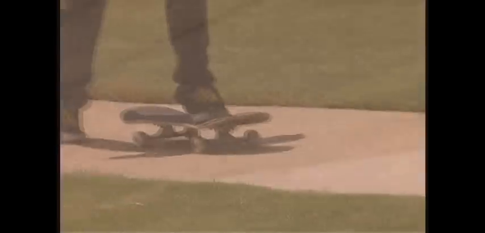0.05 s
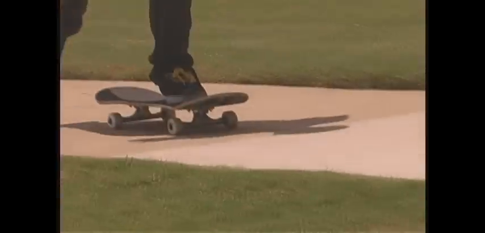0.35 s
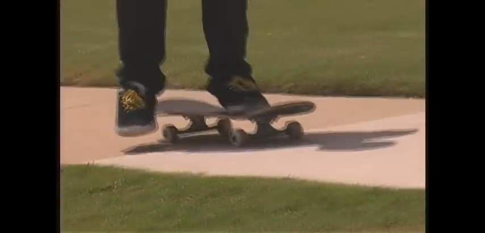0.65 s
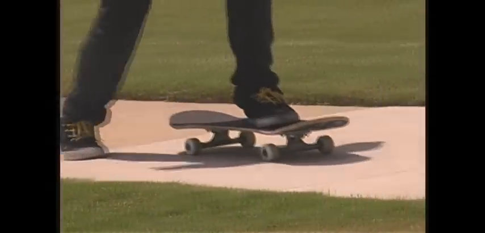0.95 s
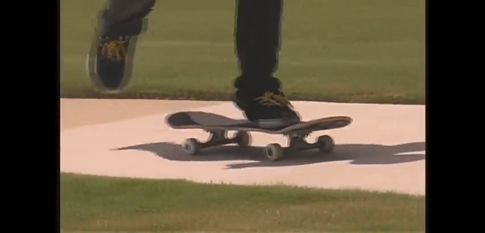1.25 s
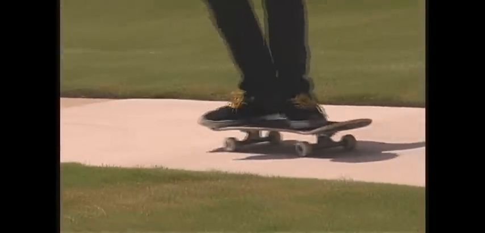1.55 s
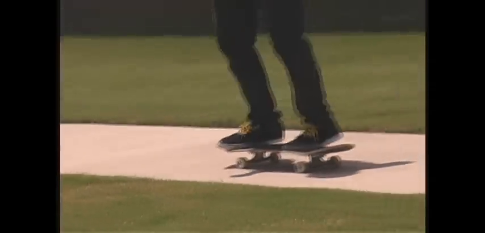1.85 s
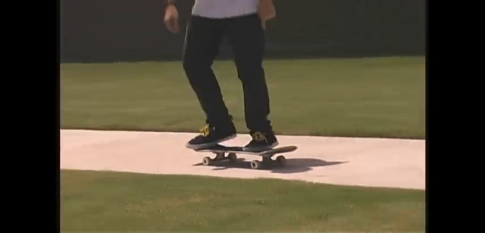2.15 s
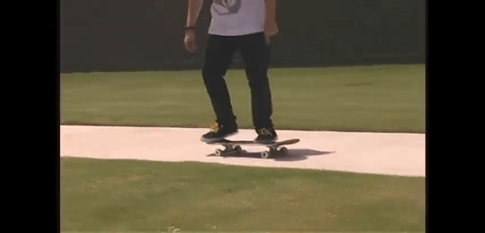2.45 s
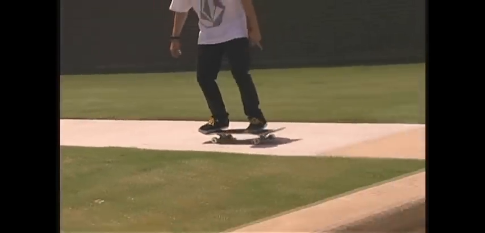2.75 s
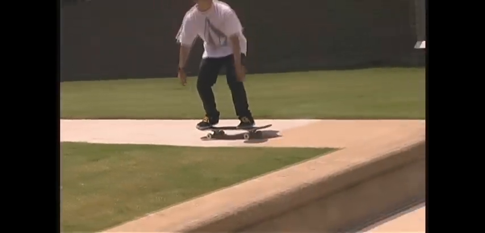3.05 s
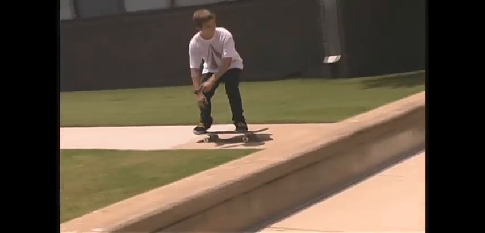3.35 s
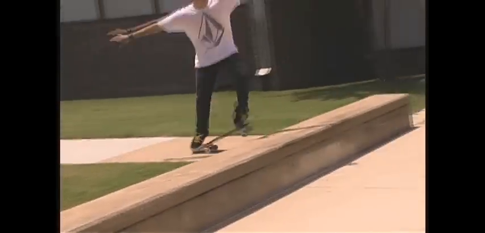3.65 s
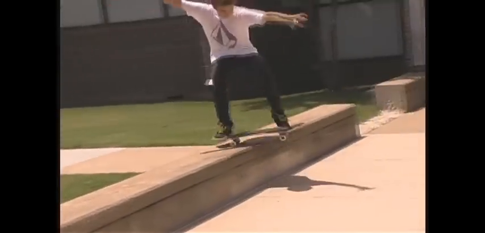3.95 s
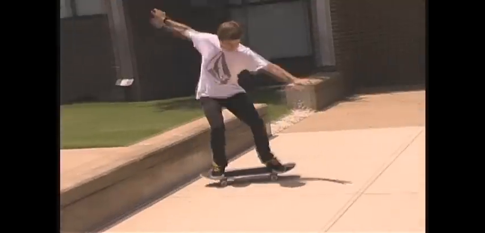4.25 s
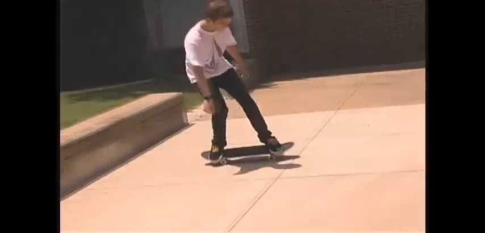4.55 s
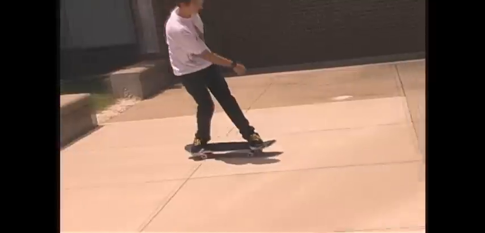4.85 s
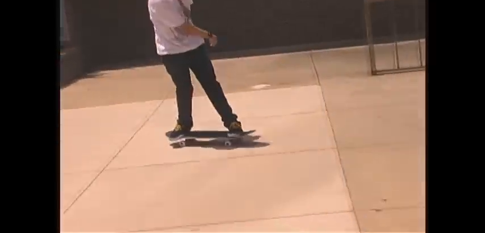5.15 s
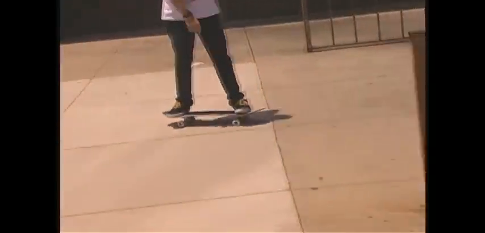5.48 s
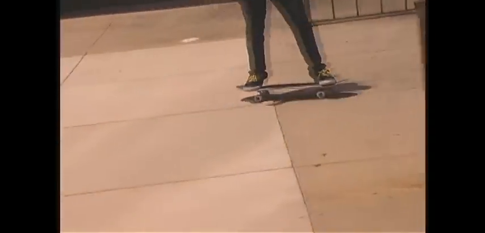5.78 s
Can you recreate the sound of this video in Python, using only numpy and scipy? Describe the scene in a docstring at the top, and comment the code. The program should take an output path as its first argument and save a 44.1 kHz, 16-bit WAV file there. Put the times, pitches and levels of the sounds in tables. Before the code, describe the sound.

A skateboard rolls along an outdoor concrete path, its hard wheels hissing over a low rumble. Soft shoe thuds and scuffs mix with dry knocks, and the wheels click across pavement joints. Around four seconds in, the board pops, cracks against a ledge and lands in a loud clatter that slightly overloads the microphone and echoes briefly off nearby walls. It then rolls on with a few more clicks.

```python
"""A skateboard pushes off along a concrete path, clacks over its joints, pops onto a ledge, drops to a
plaza and rolls away. Surface roughness makes the hard wheels hiss and drums the maple deck; each impact
excites the board's modes and rattles the loose trucks. Shoes thud and scrape, an insect buzzes faintly,
nearby buildings reflect the blows, and the landings overload the microphone."""
import sys
import numpy as np
from scipy import signal
from scipy.fft import rfft, irfft, next_fast_len
from scipy.io import wavfile
from scipy.ndimage import uniform_filter1d, map_coordinates

SR = 44100
rng = np.random.default_rng(int(sys.argv[2]) if len(sys.argv) > 2 else 0)


def waveform_to_disk(signal):
    """Save audio, clipped to [-1, 1], as 16-bit WAV at the path in sys.argv[1]."""
    frames = np.transpose(np.atleast_2d(signal))
    scaled = np.clip(frames, -1, 1) * 32767
    samples = np.round(scaled).astype(np.int16)
    wavfile.write(sys.argv[1], SR, samples)


N = 265482
TIME = np.arange(N) / SR
LANDING_S, PRESS_ATTACK_S = 4.25, 0.047  # touchdown on the plaza; rise time of the load


def amp(db):
    """Decibels to amplitude ratio."""
    return 10 ** (np.asarray(db) / 20)


def unit(x):
    """Normalisation to rms 1."""
    return x / np.sqrt(np.mean(x ** 2) + 1e-20)


def along(points, hz):
    """Interpolation of (Hz, value) points on a log frequency axis."""
    f, v = np.transpose(points)
    return np.interp(np.log(hz + 1), np.log(f + 1), v)


def strength(rows):
    """A (seconds, dB) contour, sample by sample, in dB above its median."""
    db = np.interp(TIME, *np.transpose(rows))
    return db - np.median(db)


def swell(s, width):
    """A Gaussian envelope of height 1 around time s."""
    return np.exp(-((TIME - s) / width) ** 2)


def wobble(rate):
    """Smooth random modulation, rate knots a second."""
    return map_coordinates(rng.standard_normal(int(N * rate / SR) + 4), [TIME * rate])


def resonance(hz, centre, width, power=2):
    """A resonance curve of height 1; a higher power steepens its skirts."""
    return 1 / (1 + (2 * (hz - centre) / width) ** power)


def filtered(x, gain):
    """Minimum-phase filtering with the given gain over frequency."""
    n = x.shape[-1]
    m = 2 * next_fast_len(n)
    cepstrum = irfft(np.log(np.maximum(gain(np.fft.rfftfreq(m, 1 / SR)), 1e-6)))
    cepstrum[1:m // 2] *= 2
    cepstrum[m // 2 + 1:] = 0
    return irfft(rfft(x, m) * np.exp(rfft(cepstrum)), m)[..., :n]


def add(track, s, sound):
    """Superposition of a sound on a track from time s on."""
    part = track[..., round(s * SR):][..., :sound.shape[-1]]
    part += sound[..., :part.shape[-1]]


def spread(pair, side_db, left_db):
    """Mid-side stereo from two uncorrelated signals."""
    side = amp(side_db) * pair[1]
    return np.array([(pair[0] + side) * amp(left_db / 2), (pair[0] - side) * amp(-left_db / 2)])


def air():
    """Ambient noise: the low murmur of open air."""
    # Each row: frequency in Hz, relative level in dB.
    spectrum = [(15, -3), (40, -0.5), (90, 6), (200, -25), (500, -22), (2000, -31.5), (8000, -61),
                (14000, -70)]
    noise = unit(filtered(rng.standard_normal((2, N)), lambda hz: amp(along(spectrum, hz))))
    return amp(-52) * spread(noise, side_db=-17.5, left_db=-3)


def insect(centre_hz=8050, width_hz=950, pulses_per_s=23, unsteady=0.064):
    """Amplitude modulation: slightly uneven wing strokes pulse a narrow band of noise."""
    buzz = unit(filtered(rng.standard_normal(N), lambda hz: resonance(hz, centre_hz, width_hz, power=4)))
    rate = pulses_per_s * (1 + unsteady * wobble(4.9))
    strokes = np.sin(np.pi * np.cumsum(rate) / SR) ** 4
    return amp(-59) * swell(s=1, width=0.5) * unit(strokes) * buzz


def yard(x, build_s):
    """Diffuse reflections from ledge and buildings build up and decay, uncorrelated in the two ears."""
    # Each row: frequency in Hz, reverberation time in seconds.
    t60s = [(100, 0.17), (300, 0.89), (600, 0.11), (1600, 0.58), (4000, 0.39), (8000, 0.39), (14000, 0.31)]
    spectrum = [(100, -38), (280, 10), (550, -2.5), (1600, 2), (4000, 1), (10000, -0.5)]  # Hz, dB
    hz, t, noise = signal.stft(rng.standard_normal((2, SR)), SR, nperseg=256)
    colour = amp(along(spectrum, hz))[:, None]
    envelope = amp(-60 * t / along(t60s, hz)[:, None]) * (1 - np.exp(-t / build_s))
    tail = signal.istft(noise * colour * envelope, SR, nperseg=256)[1]
    return signal.fftconvolve(x.mean(axis=0)[None], tail / np.linalg.norm(tail[0]), axes=1)[:, :N]


def steps(push_hz=175, t60=0.071, gain_db=-2):
    """Damped impact: a rubber sole gives a dull push with a short puff."""
    # Each row: start in seconds, relative level in dB.
    footfalls = [(0.297, -19.5), (0.421, -28), (0.461, -19.5), (0.512, -22.5)]
    spectrum = [(80, -5), (200, 6.5), (600, 2), (1100, -22), (4000, -43)]  # Hz, dB
    out, t = np.zeros(N), np.arange(SR // 4) / SR
    push = np.sin(2 * np.pi * push_hz * t)
    envelope = amp(gain_db - 60 * t / t60) * (1 - np.exp(-t / 0.0025))
    for s, db in footfalls:
        puff = unit(filtered(rng.standard_normal(len(t)), lambda hz: amp(along(spectrum, hz))))
        add(out, s, amp(db) * envelope * (push + 0.73 * puff))
    return out * amp([[1.5], [-1.5]])


def scuffs(slips_per_s=170, slip_decay_s=0.0015, fade_db=7):
    """Stick-slip friction of a sole on grip tape: uneven little snaps on a rasp."""
    # Each row: start in seconds, length in seconds, level in dB, treble gain in dB.
    scrapes = [(0.054, 0.14, -43, -16), (0.913, 0.16, -45, 4), (1.577, 0.17, -43, -3),
               (2.251, 0.087, -38, -5.5), (3.828, 0.058, -36.5, -3), (3.941, 0.071, -41.5, 5),
               (4.138, 0.14, -37, -1), (5.743, 0.27, -43, 14)]
    spectrum = [(400, -9), (1500, -2.5), (2600, -1.5), (3600, 1), (6000, -2.5), (9000, -6.5),
                (14000, -28)]  # Hz, dB
    out = np.zeros((2, N))
    for s, length, db, treble_db in scrapes:
        progress = np.linspace(0, 1, round(length * SR))
        n = len(progress)
        slips = (rng.random(n) < slips_per_s / SR) * rng.uniform(0.56, 1, n)
        force = 0.15 + signal.lfilter([1], [1, -np.exp(-1 / (slip_decay_s * SR))], slips)
        colour = lambda hz: amp(along(spectrum, hz) + along([(2600, 0), (5000, treble_db)], hz))
        rasp = unit(filtered(force * rng.standard_normal((2, n)), colour))
        envelope = np.sqrt(np.abs(np.sin(np.pi * progress))) * amp(db + fade_db * (0.5 - progress))
        add(out, s, envelope * spread(rasp, side_db=-39, left_db=-1.5))
    return out


def grit(spiky_db):
    """Roughness excitation: countless tiny contacts, a few far stronger than the rest."""
    sizes = amp(spiky_db * rng.exponential(size=(2, N // 16 + 1)).clip(0, 6))
    envelope = uniform_filter1d(sizes.repeat(16, axis=1), size=8)[:, :N]
    return unit(envelope * rng.standard_normal((2, N)))


def board(hz, between_db, scatter_db=0):
    """Modal response of deck, trucks and wheels over a flat floor; contact points reweight the modes."""
    # Each row: frequency in Hz, bandwidth in Hz, relative level in dB.
    modes = [(680, 74, 1), (1030, 560, -8), (1302, 120, -1.5), (1630, 128, 4), (2214, 226, 3.5),
             (2560, 82, 1), (2930, 290, 1), (3440, 140, -30), (3690, 380, 0), (4700, 970, -3),
             (6070, 280, -5), (6980, 550, -6.5)]
    weights_db = scatter_db * rng.standard_normal(len(modes))
    peaks = sum(amp(db + extra_db) ** 2 * resonance(hz, centre, width)
                for (centre, width, db), extra_db in zip(modes, weights_db))
    return np.sqrt(peaks + amp(between_db) ** 2)


def sing(centre_hz=2440, width_hz=540):
    """Lateral creep: leaning wheels slide on the concrete and ring in one narrow resonance."""
    # Each row: centre in seconds, half width in seconds, level in dB.
    leans = [(.12, 0.1, -49), (1.04, 0.025, -52), (1.68, 0.043, -44.5), (3.04, 0.049, -47.5)]
    ring = unit(filtered(grit(spiky_db=2.5), lambda hz: resonance(hz, centre_hz, width_hz)))
    envelope = sum(amp(db) * swell(s, width) for s, width, db in leans)
    return spread(ring, side_db=-3, left_db=-5) * envelope


def whirr(roll_db, follows=0.98, full_speed_s=6.1, slow_start_db=-6.5):
    """Resonances of the spinning wheels grow with speed; path and plaza favour different ones."""
    # Each row: frequency in Hz, width in Hz, base level on path and on plaza in dB, mid-air gain in dB.
    modes = [(1220, 510, -53, -61.5, 11), (1625, 650, -59, -49.5, 12), (2400, 690, -62, -59.5, 8)]
    out = np.zeros((2, N))
    drive_db = follows * roll_db + np.interp(TIME, [0, full_speed_s], [slow_start_db, 0])
    free_spin = swell(s=3.97, width=0.04)
    for centre, width, path_db, plaza_db, spin_db in modes:
        ring = unit(filtered(grit(spiky_db=4), lambda hz: resonance(hz, centre, width)))
        mode_db = np.where(TIME < LANDING_S, path_db, plaza_db) + spin_db * free_spin
        out += amp(mode_db + drive_db + 3.1 * wobble(21.83)) * spread(ring, side_db=-6, left_db=-1)
    return out


def drone(deck_db, mode_hz=150, sag_hz=27.57, waver=0.013, follows=2.12, crouch_db=9):
    """Rolling sustains the deck's main bending mode; a crouching rider's load makes it lower and louder."""
    crouch = swell(s=3.25, width=0.13)
    hz = (mode_hz - sag_hz * crouch) * (1 + waver * wobble(25))
    phase = 2 * np.pi * np.cumsum(hz) / SR
    ground_db = np.where(TIME < LANDING_S, -52.5, -42.5)  # clearer on the smooth plaza
    return np.sin(phase) * amp(ground_db + follows * deck_db + crouch_db * crouch + wobble(11))


def boom(centre_hz=258, width_hz=150, level_db=-29, t60=1):
    """Resonant decay: after the drop the fully loaded deck rings on, low and rough."""
    noise = rng.standard_normal((2, N))
    ring = unit(filtered(noise, lambda hz: resonance(hz, centre_hz, width_hz, power=4)))
    age = np.maximum(TIME - LANDING_S, 0)
    envelope = amp(level_db - 60 * age / t60) * np.minimum(age / PRESS_ATTACK_S, 1)
    return spread(ring, side_db=-10, left_db=1) * envelope


def press(hold_s=0.14, release_s=0.08):
    """Contact load, 0 to 1: the rider's weight bears down after the drop."""
    corners = LANDING_S + np.cumsum([0, PRESS_ATTACK_S, hold_s, release_s])
    return np.interp(TIME, corners, [0, 1, 1, 0])


def rolling(roll_db, deck_db):
    """Forced vibration: rough concrete shakes the deck, growls in the wheels, hisses at the contacts."""
    # Each row: frequency in Hz, relative level in dB.
    deck_spectrum = [(24, -30.5), (40, -1), (81, -2), (113, -0.5), (139, 1.5), (281, -9.5), (462, -25.5),
                     (600, -35), (780, -39), (1320, -120)]
    wheel_spectrum = [(300, 0.5), (550, 2), (850, 3), (1500, -7.5), (2300, -3.5), (4000, -4), (8000, -43.5)]
    contact_spectrum = [(900, -42), (2300, -8.5), (4000, 1), (6500, 0.5), (9000, -5), (11000, -13.5),
                        (13000, -25), (15000, -63)]
    load = press()
    texture = amp(wobble(28))  # patches of coarser and smoother ground
    rumble = filtered(grit(spiky_db=3), lambda hz: amp(along(deck_spectrum, hz)))
    growl = filtered(grit(spiky_db=2), lambda hz: amp(along(wheel_spectrum, hz)) * board(hz, 8))
    hiss = filtered(grit(spiky_db=2.5), lambda hz: amp(along(contact_spectrum, hz)) * board(hz, 11))
    rumble = spread(unit(rumble), side_db=-13, left_db=-1) * amp(-43 + deck_db + 12 * load)
    growl = spread(unit(growl), side_db=-1, left_db=0.8) * amp(-51.5 + 0.34 * roll_db + 14 * load)
    hiss = spread(unit(hiss), side_db=-11.5, left_db=-0.2) * amp(-49.5 + roll_db + 15 * load)
    return texture * (rumble + growl + hiss)


def flex(t):
    """Free vibration: the struck deck's bending modes decay, varying in level and pitch at each blow."""
    # Each row: mean frequency in Hz, relative level in dB, 60 dB decay time in seconds.
    modes = [(107.5, -9.5, 0.28), (153, 1.5, 0.067), (210.6, -1, 0.15), (284.3, -4.5, 0.14)]
    bend = np.zeros(len(t))
    for k, (hz, db, t60) in enumerate(modes):
        decay = amp(db + rng.normal(0, 0.89) - 60 * t / t60)
        bend += (-1) ** k * decay * np.sin(2 * np.pi * hz * rng.normal(1, 0.0575) * t)
    bend *= 1 - np.exp(-t / 0.0014)  # the rider's weight comes on gradually
    return bend / np.abs(bend).max()


def blows(rows, hold, rattle_db, rattle_t60, chatter_db, gain_db, treble_db, wood_hz,
          flex_db, side_db, rise_s):
    """Impact excitation: a burst of contacts and a faint truck rattle ring the board; the deck bends."""
    # Each row: frequency in Hz, relative level in dB.
    crack = [(200, -2.5), (500, -7.5), (900, 1), (1600, -3), (3200, -1.5), (6500, 1.5), (9000, -2),
             (12000, -16), (15000, -29)]
    side_spectrum = [(600, 17), (1500, 14.5), (4000, 3), (9000, -4)]  # the clack's low and middle notes sound wide, its treble centred
    out, t = np.zeros((2, N)), np.arange(SR // 4) / SR
    for s, db, wood_db, t60 in rows:
        chatter = amp(chatter_db * unit(uniform_filter1d(rng.standard_normal(len(t)), size=40)))
        burst = amp(-60 * (t / t60) ** hold)  # hold above 1: contacts persist, then stop quickly
        rattle = amp(rattle_db - 60 * t / rattle_t60)
        force = chatter * (burst + rattle) * (1 - np.exp(-t / rise_s))
        # where the board is hit tips the colour towards wood or metal
        tilt = [(wood_hz, wood_db), (2 * wood_hz, 0), (5500, 0), (9000, treble_db)]
        colour = lambda hz: amp(along(crack, hz) + along(tilt, hz)) * board(hz, -5, scatter_db=3)
        clack = filtered(force * rng.standard_normal((2, len(t))), colour)
        clack /= np.sqrt(uniform_filter1d(clack ** 2, size=128).max(axis=1, keepdims=True))
        clack[1] = filtered(clack[1], lambda hz: amp(along(side_spectrum, hz)))
        thump = amp(flex_db + 0.61 * wood_db) * flex(t)  # woodier blows bend the deck more
        add(out, s, amp(db) * (amp(gain_db) * spread(clack, side_db, left_db=-0.5) + thump))
    return out


def knocks():
    """Light impacts: deck and trucks knock drily as the feet shift."""
    # Each row: start in seconds, relative level in dB, woodiness in dB, 60 dB decay time in seconds.
    hits = [(.045, -4, -1.5, 0.022), (.077, -13.5, -1, 0.03), (.116, -25, -12, .016),
            (.126, -14, -7.5, 0.016), (.905, -6, -9.5, 0.017), (1.294, -17.5, -9.5, .014),
            (1.328, -17, -31, 0.016), (1.542, -20, -10, 0.016), (1.556, -3, -0.5, 0.029),
            (1.568, -9.5, -0.5, 0.015), (2.3, -14.5, -9, 0.02), (5.953, -13, -1, 0.019)]
    return blows(hits, hold=0.93, rattle_db=-22.5, rattle_t60=0.25, chatter_db=1, gain_db=-10,
                 treble_db=-8.5, wood_hz=1330, flex_db=-27, side_db=-23, rise_s=0.00039)


def joints():
    """Impacts at surface discontinuities: the wheels strike joints in the concrete."""
    # Each row: start in seconds, relative level in dB, woodiness in dB, 60 dB decay time in seconds.
    hits = [(.458, -28, 13, 0.056), (.484, -29, 7, 0.027), (.734, -25, 4.5, 0.06), (1.389, -12, 3.5, 0.058),
            (1.4, -25, -8, 0.027), (1.838, -21, -11.5, 0.071), (1.969, -12, 3.5, 0.034),
            (2.091, -21, 2.5, 0.076), (2.127, -17, 6.5, 0.035), (2.591, -16.5, 3, 0.043),
            (2.598, -14, 10.5, 0.024), (2.739, -14.5, 8.5, 0.034), (2.909, -13, 3.5, 0.042),
            (3.22, -16.5, 8.5, 0.045), (3.405, -17.5, 8.5, 0.027), (3.698, -29, 7, 0.028),
            (4.788, -10.5, 1, 0.024), (4.827, -21, 4, 0.032), (4.965, -24.5, 0, 0.022),
            (4.995, -15.5, 6.5, .055), (5.735, -12.5, 11.5, 0.027), (5.762, -17, 4, 0.021),
            (6.012, -18.5, 15.5, .04)]
    return blows(hits, hold=1.35, rattle_db=-23.5, rattle_t60=0.61, chatter_db=5, gain_db=-8,
                 treble_db=2, wood_hz=960, flex_db=-19, side_db=-32.5, rise_s=0.00051)


def slams():
    """Heavy impacts: the pop, the blows on the ledge and the landing."""
    # Each row: start in seconds, relative level in dB, woodiness in dB, 60 dB decay time in seconds.
    hits = [(3.816, -16, -3.5, 0.049), (4.078, -0.5, -14.5, 0.022), (4.082, 0, 1.5, 0.033),
            (4.12, -4, -3, 0.047), (4.194, -20, 2, .049), (4.21, -16.5, 3.5, 0.034), (4.271, 3.5, 1, 0.022),
            (4.28, -5.5, 6.5, 0.078), (4.315, 4, 0.5, .021), (4.335, 1, 4.5, 0.03),
            (4.344, -3.5, 1.5, 0.068), (4.375, -2.5, 0, 0.061), (4.449, -12.5, 7.5, 0.034)]
    trick = blows(hits, hold=1.42, rattle_db=-18, rattle_t60=0.26, chatter_db=2.5, gain_db=-6.5,
                  treble_db=-4, wood_hz=1310, flex_db=-16, side_db=-27.5, rise_s=0.00036)
    return trick * amp([[-0.9], [0.9]])


def scene():
    """Direct and reflected sound superpose; the trick, closer to the walls, wakes more echo."""
    # Each row: time in seconds, relative level in dB of the grit hiss (roll) or the rumble (deck).
    path_roll = [(0.0, -51.5), (0.22, -56.5), (0.46, -56.5), (0.89, -51), (1.32, -54), (1.48, -50),
                 (1.68, -46), (2.09, -49.5), (2.19, -52), (2.37, -47), (2.76, -48), (3.45, -52),
                 (3.78, -50.5)]
    plaza_roll = [(4.55, -49.5), (4.906, -47.5), (5.13, -55), (5.61, -60), (5.77, -46.5), (5.908, -48),
                  (6.02, -52)]
    path_deck = [(0.0, -35), (0.86, -45.5), (2.11, -44), (2.52, -40), (2.87, -44), (3.46, -37.5),
                 (3.82, -46), (4.03, -50.5)]
    plaza_deck = [(4.6, -45.5), (4.92, -47), (6.02, -39)]
    roll_db = strength(np.vstack([path_roll, plaza_roll]))
    deck_db = strength(np.vstack([path_deck, plaza_deck]))
    clacks, trick = knocks() + joints(), slams()
    echo = amp(-18) * yard(clacks, build_s=0.025)
    echo += amp(-13) * yard(trick, build_s=0.048) * amp([[-1.5], [1.5]])
    wheels = rolling(roll_db, deck_db) + whirr(roll_db) + sing() + boom() + drone(deck_db)
    return clacks + trick + echo + steps() + scuffs() + wheels + insect() + air()


def record(dry, ceiling=0.95, top_hz=14300):
    """Two-port stereo colour and microphone saturation, then a soft roll-off of the highest treble."""
    # Each row: frequency in Hz, left minus right level in dB.
    port_balance = [(60, 3), (110, 3.0), (200, 5.5), (370, 4.5), (690, -2), (1270, -0.5), (2330, 0.0),
                    (4290, 0.5), (7890, 1), (14500, 0.5)]
    # Each row: frequency in Hz, lag of the right port in radians.
    port_phase = [(0, 0), (340, 1.05), (600, 2.9), (860, 5.3), (1150, 6.0), (3000, 6.15), (8000, 6.28)]
    hz = np.fft.rfftfreq(N, 1 / SR)
    left = amp(along(port_balance, hz) / 2)
    right = np.exp(-1j * np.interp(hz, *np.transpose(port_phase))) / left
    heard = irfft(rfft(dry) * np.array([left, right]), N)
    saturated = heard / (1 + np.abs(heard / ceiling) ** 6) ** (1 / 6)
    roll_off = np.interp(hz, [top_hz - 1100, top_hz + 500], [1, 0])
    return irfft(rfft(saturated) * roll_off, N)


dry = scene()
out = record(dry)
waveform_to_disk(out)
```